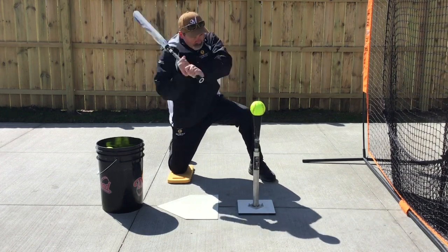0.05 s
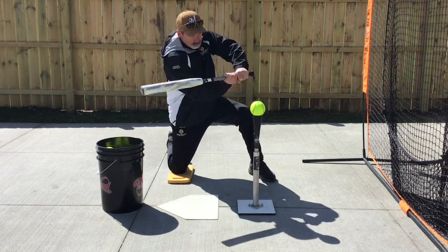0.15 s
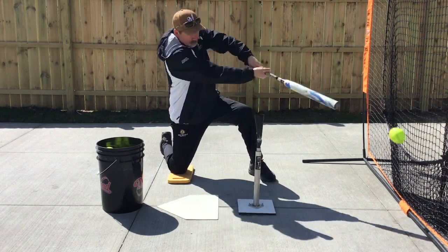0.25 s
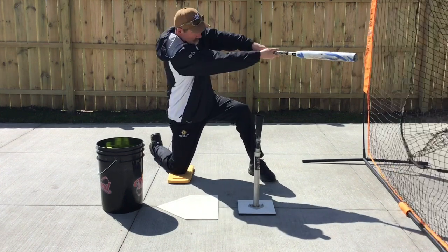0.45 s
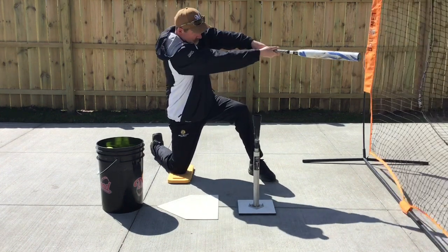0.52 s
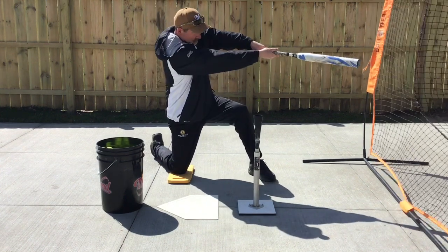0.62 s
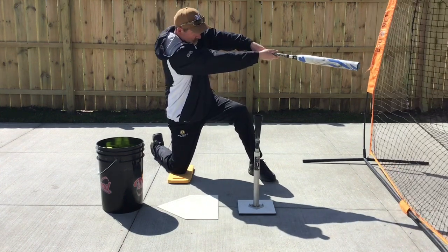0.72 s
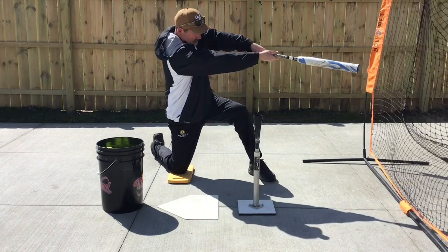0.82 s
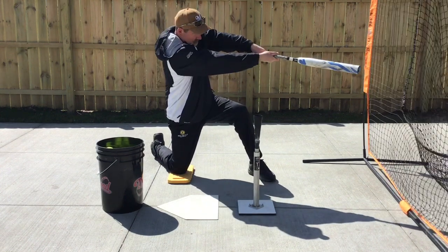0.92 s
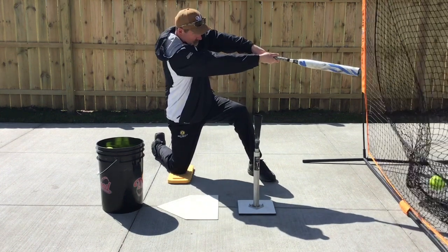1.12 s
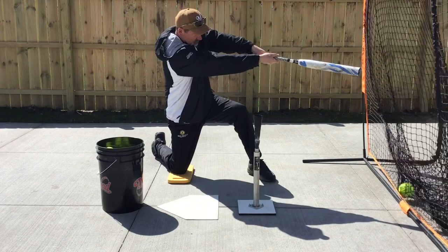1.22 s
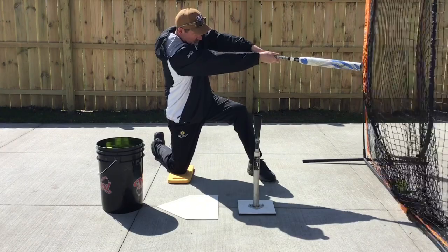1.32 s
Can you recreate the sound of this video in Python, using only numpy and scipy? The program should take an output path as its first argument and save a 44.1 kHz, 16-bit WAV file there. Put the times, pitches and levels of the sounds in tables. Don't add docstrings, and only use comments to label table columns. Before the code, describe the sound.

Bat hits a ball off a tee with a bright dry crack, slapping back off fence and concrete. Net and frame rattle lightly, then the ball bounces twice, over low distant traffic, in one mono outdoor microphone.

```python
import sys
import numpy as np
from scipy import signal
from scipy.fft import rfft, irfft
from scipy.io import wavfile
from scipy.ndimage import uniform_filter1d

SR = 44100
rng = np.random.default_rng(int(sys.argv[2]) if len(sys.argv) > 2 else 0)


def master(y):
    cut = np.clip(np.atleast_2d(y).T, -1, 1)
    pcm = np.round(cut * 32767)
    wavfile.write(sys.argv[1], SR, pcm.astype(np.int16))


def gain_from_decibels(decibels):
    exponent = np.asarray(decibels, float) / 20
    return 10 ** exponent


N = 59535


def evened(x):
    return x / np.sqrt(np.mean(x ** 2) + 1e-20)


def read(points, hz):
    table_hz, value = np.transpose(points)
    return np.interp(np.log(hz + 1), np.log(table_hz + 1), value)


def add(mix, s, sound):
    part = mix[round(s * SR):][:len(sound)]
    part += sound[:len(part)]


def coloured(points, size=N):
    spectrum = rfft(rng.standard_normal(size))
    gain = gain_from_decibels(read(points, np.fft.rfftfreq(size, 1 / SR)))
    return evened(irfft(spectrum * gain, size))


def band(x, lo_hz, hi_hz):
    edges = [lo_hz, min(hi_hz, 19000)]
    return signal.sosfilt(signal.butter(2, edges, "band", fs=SR, output="sos"), x)


def resonate(x, hz, width_hz):
    turn = np.exp(2j * np.pi * hz * np.arange(len(x)) / SR)
    r = np.exp(-np.pi * width_hz / SR)
    return 2 * (turn * signal.lfilter([1 - r], [1, -r], x / turn)).real


def ring(modes):
    t = np.arange(SR // 4) / SR
    return sum(gain_from_decibels(db - 60 * t / t60) * np.sin(2 * np.pi * hz * t) for hz, db, t60 in modes)


def push(t, hz, lobe):
    u = (np.pi * hz * t) ** 2
    return lobe * np.exp(-u / 2) - np.exp(-2 * u)


def tail(share):
    # pitch in Hz, time to fade by 60 dB in seconds.
    fade = [(200, .25), (600, 0.5), (1800, 0.81), (4000, 0.5), (8000, 0.19), (15000, 1)]
    # pitch in Hz, level in dB.
    colour = [(100, -16.5), (300, 10), (700, 2), (1200, 4), (1800, -7), (3500, -0.5), (7000, 6.5),
              (15000, -15.5)]
    taps = np.zeros(SR)
    at = np.arange(100, SR - 20, 20)
    taps[at + rng.integers(0, 20, len(at))] = rng.choice([-1., 1.], len(at))
    hz, t, z = signal.stft(taps, SR, nperseg=256)
    t60 = share * read(fade, hz)[:, None]
    level_db = read(colour, hz)[:, None] - 60 * t / t60
    out = signal.istft(z * gain_from_decibels(level_db), SR, nperseg=256)[1]
    return out / np.linalg.norm(out)


def town():
    # pitch in Hz, level in dB per Hz.
    traffic_colour = [(32, -34), (55, 2), (109, 0), (200, -10.5), (780, -19), (1580, -30), (4430, -42.5),
                      (7000, -57), (15000, -56)]
    lumps = rng.standard_normal(N)
    for _ in range(2):
        lumps = uniform_filter1d(lumps, 1500)
    gust_db = -57.5 + 3 * evened(lumps)
    gusts = gain_from_decibels(gust_db) * evened(band(rng.standard_normal(N), 50, 150))
    traffic = gain_from_decibels(-55) * coloured(traffic_colour)
    hum = gain_from_decibels(-59) * evened(resonate(rng.standard_normal(N), hz=77, width_hz=12))
    return gusts + traffic + hum


def swish():
    # time in seconds, level in dB.
    loudness = [(0, -81), (.1, -68.5), (.2, -60.5), (0.24, -51), (0.298, -46), (.42, -57.5), (0.468, -55),
                (.6, -64), (.66, -63.5), (.74, -91), (1.281, -94), (1.286, -51.5), (1.311, -66),
                (1.35, -71.5)]
    # pitch in Hz, level in dB.
    colour = [(200, 13.5), (800, 0), (2500, -6), (5000, -8), (7500, -16), (9000, -13), (16000, -36)]
    s, db = np.transpose(loudness)
    return gain_from_decibels(np.interp(np.arange(N) / SR, s, db, right=-120)) * coloured(colour)


def smear(delay):
    t = np.arange(600) / SR
    chosen = rng.random(len(t)) < .12
    taps = rng.standard_normal(len(t)) * chosen * gain_from_decibels(-5 - 60 * t / 0.035)
    taps *= delay > .004
    taps[0] = gain_from_decibels(-61 * delay)
    return taps / np.linalg.norm(taps)


def bat():
    # pitch in Hz, level in dB, time to fade by 60 dB in seconds.
    barrel = [(644, -14, 0.018), (800, -14.5, 0.017), (1626, -11, 0.014), (1770, -19.5, 0.052),
              (2450, -4.5, 0.003), (3000, -20.5, 0.017), (4197, -2, 0.0018), (5500, -23.5, 0.004),
              (290, -25, 0.076), (2223, -26, 0.018)]
    # delay in seconds, level in dB, low edge in Hz, high edge in Hz.
    echoes = [(.0014, 3.5, 60, 9000), (.0048, -8, 1200, 4900), (.0105, 1, 1030, 16250),
              (.0119, -12.5, 900, 5900), (.0132, -8.5, 600, 4040), (.0152, -6.5, 283, 4940),
              (.0238, -12, 302, 5000), (.029, -14.5, 290, 3964), (.0485, -28, 296, 3000),
              (.0555, -6.5, 150, 1180), (.064, -14, 6000, 11900), (.0715, -14.5, 712.6, 8780),
              (.0735, -20, 600, 4050), (.091, -13.5, 292, 1855), (.134, -20.5, 865, 4430),
              (0.149, -22.5, 1980, 5500), (.215, -36.5, 1000, 9000)]
    hit_s = .2406
    split_s, blow_s = .0004, .0009
    t = np.arange(SR // 8) / SR

    split = band(rng.standard_normal(len(t)), 1800, 12000)
    split *= (t > split_s) * gain_from_decibels(-9 - 60 * t / 0.004)
    crack = 1.79 * push(t - blow_s, hz=1470, lobe=0.47) + split
    fizz = gain_from_decibels(-29.5 - 60 * t / 0.044) * band(rng.standard_normal(len(t)), 7000, 24000)
    add(crack, split_s, fizz)
    add(crack, blow_s, ring(barrel)[:4000])
    crack = gain_from_decibels(-6.5) * (crack - uniform_filter1d(crack, size=110))

    direct, reflected = np.zeros(N), np.zeros(N)
    add(direct, hit_s, crack)
    for delay, db, lo_hz, hi_hz in echoes:
        copy = signal.fftconvolve(crack, smear(delay))
        add(reflected, hit_s + delay, gain_from_decibels(db) * band(copy, lo_hz, hi_hz))
    yard = gain_from_decibels(-7) * tail(0.88) + gain_from_decibels(-8.5) * tail(0.19)
    return direct + reflected + signal.fftconvolve(direct, yard)[:N]


def frame():
    # pitch in Hz, width in Hz, level in dB.
    resonances = [(600, 360, 10.5), (1210, 220, 7.5), (1570, 570, 13.5), (2267, 230, 6), (2650, 140, 8),
                  (3000, 2300, -4.5), (4000, 118, 1), (5900, 220, -40), (7480, 240, -1.5),
                  (8020, 1100, 0.5), (8620, 480, -4), (9720, 620, -5.5), (11000, 400, -12),
                  (13700, 4700, -10)]
    # start in seconds, level in dB, time to fade by 60 dB in seconds, brightness in dB.
    rattles = [(.598, -74.5, 0.2, 16.5), (.612, -66, 0.13, 6), (0.6325, -53, 0.12, 7),
               (0.644, -52, 0.12, 6), (0.666, -64, 0.37, 8.5), (0.694, -61.5, 0.26, -17),
               (0.706, -55, 0.08, -26.5), (0.834, -62.5, 0.13, -21.5), (0.849, -58.5, 0.13, -33.5),
               (1.078, -67, 0.073, -14), (1.2829, -52.5, .2, 3.5), (1.294, -54, 0.44, -5),
               (1.328, -56.5, 0.56, -21)]
    out, t = np.zeros(N), np.arange(SR // 4) / SR
    for s, db, t60, bright_db in rattles:
        force = np.repeat(rng.exponential(1, len(t)), 60)[:len(t)]
        knocks = rng.standard_normal(len(t)) * gain_from_decibels(2.3 * force)
        body = np.zeros(len(t))
        for hz, width_hz, mode_db in resonances:
            tone = evened(resonate(resonate(knocks, hz, width_hz), hz, width_hz))
            brighten_db = bright_db * np.clip((hz - 3000) / 3000, 0, 1)
            dull_db = 72 * t * np.clip((hz - 7400) / 1000, 0, 1.6)
            body += gain_from_decibels(mode_db + brighten_db - dull_db) * tone
        onset = np.minimum(t / 0.0013, 1)
        add(out, s, gain_from_decibels(db - 15 - 60 * t / t60) * onset * body)
    return out


def birds():
    # start in seconds, length in seconds, first pitch in Hz, last pitch in Hz, level in dB.
    chirps = [(.858, 0.059, 5170, 4630, -74.5), (0.864, 0.024, 4480, 4220, -79.5),
              (0.892, 0.043, 4480, 3790, -76.5), (0.938, 0.05, 5140, 4870, -74.5),
              (0.937, 0.0341, 2650, 2350, -70), (.958, 0.0084, 3440, 3700, -65),
              (0.969, 0.017, 4600, 4280, -70), (0.971, 0.04, 3380, 3210, -67),
              (0.95, 0.017, 6140, 6150, -89), (1.125, 0.021, 4600, 5100, -69.5),
              (1.202, .018, 5230, 5050, -67), (1.207, 0.015, 2640, 2540, -66.5)]
    out = np.zeros(N)
    for s, length, from_hz, to_hz, db in chirps:
        u = np.arange(0, 1, 1 / (length * SR))
        flutter = 1 + 4.5 * uniform_filter1d(rng.standard_normal(4000), 80)[:len(u)]
        hz = from_hz + (to_hz - from_hz) * u
        whistle = np.sin(2 * np.pi * np.cumsum(hz) / SR)
        add(out, s, gain_from_decibels(db - 2) * np.sqrt(np.sin(np.pi * u)) * flutter * whistle)
    return out + gain_from_decibels(-9) * signal.fftconvolve(out, tail(.25))[:N]


def ball():
    # time in seconds, level in dB, pitch in Hz.
    thuds = [(1.0195, -36, 400), (1.0223, -33, 1100), (1.0234, -21, 560), (1.0277, -28, 700),
             (1.0288, -33, 500), (1.0345, -34, 450), (1.0402, -31, 400), (1.0436, -35, 550),
             (1.081, -42, 800), (1.2912, -35, 420), (1.2945, -39, 500), (1.298, -41, 600)]
    # start in seconds, level in dB, low edge in Hz, high edge in Hz.
    ticks = [(1.0213, -34, 3500, 13000), (1.0212, -31, 2200, 3600), (1.0258, -35, 8000, 14000),
             (1.0268, -37, 2200, 5500), (1.029, -40, 2200, 5000), (1.0318, -47, 8000, 13000),
             (1.036, -49, 5000, 16000), (1.037, -39, 2300, 4500), (1.0418, -43, 5500, 11000),
             (1.042, -40, 2300, 4200), (1.0795, -41, 400, 1100)]
    # pitch in Hz, level in dB, time to fade by 60 dB in seconds.
    hollow = [(205.2, -38.5, .12), (247, -33.5, 0.071), (566, -37.5, 0.15), (2660, -50, 0.074),
              (2830, -43, 0.087)]
    # start in seconds, level in dB.
    rings = [
        (1.02, -4.5),
        (1.284, -6),
    ]
    out, t = np.zeros(N), np.arange(800) / SR
    lead_s = 300 / SR
    for s, db, hz in thuds:
        add(out, s - lead_s, 1.53 * gain_from_decibels(db) * push(t - lead_s, hz, lobe=0.23))
    for s, db, lo_hz, hi_hz in ticks:
        tick = rng.standard_normal(len(t)) * gain_from_decibels(db - 60 * t / 0.0044)
        add(out, s, band(band(tick, lo_hz, hi_hz), lo_hz, hi_hz))
    onset = np.minimum(np.arange(SR // 4) / SR / 0.0064, 1)
    for s, db in rings:
        add(out, s, gain_from_decibels(db) * ring(hollow) * onset)
    return out + gain_from_decibels(-13.5) * signal.fftconvolve(out, tail(0.65))[:N]


def scene():
    return (town() + swish() + bat() + frame() + birds() + ball())[None]


def band_limit(x):
    return signal.sosfilt(signal.butter(12, 16890, fs=SR, output="sos"), x)


def record(dry):
    treble_edge = signal.firwin(255, 16000, window=("kaiser", 4.5), fs=SR)
    mix = signal.oaconvolve(dry, treble_edge[None], "same")
    mix = signal.sosfilt(signal.butter(5, 50, "high", fs=SR, output="sos"), mix)
    return band_limit(mix)


dry = scene()
out = record(dry)
master(out)
```